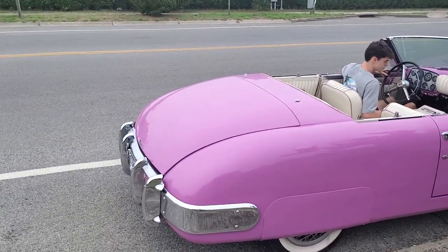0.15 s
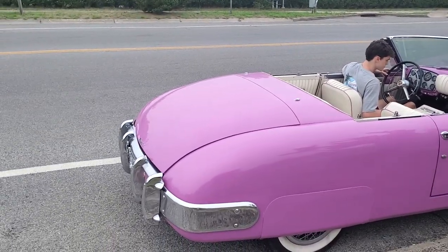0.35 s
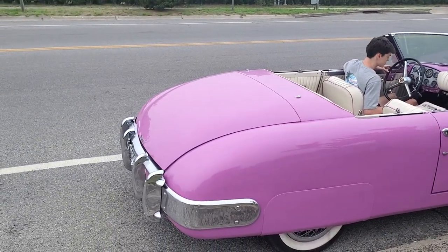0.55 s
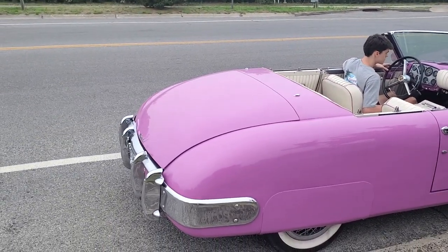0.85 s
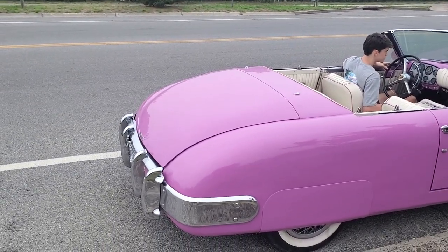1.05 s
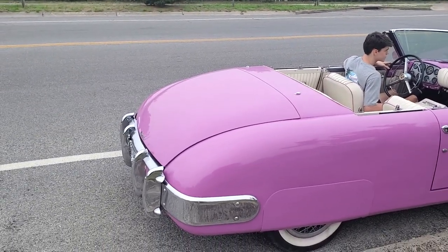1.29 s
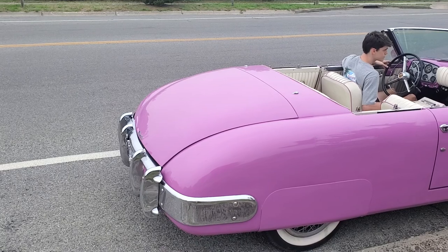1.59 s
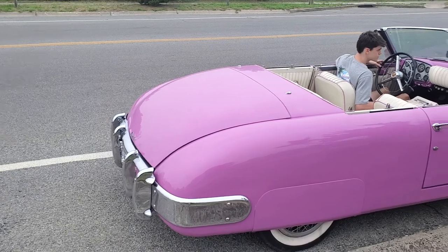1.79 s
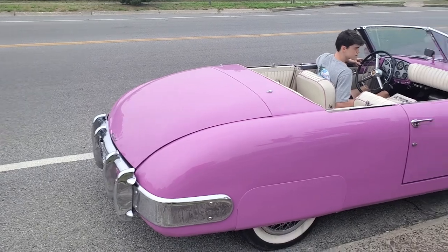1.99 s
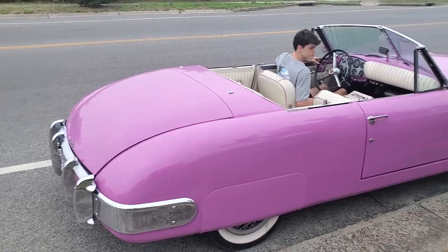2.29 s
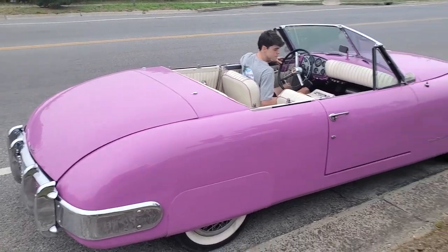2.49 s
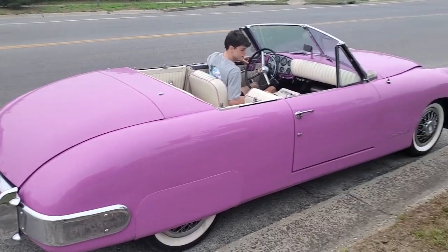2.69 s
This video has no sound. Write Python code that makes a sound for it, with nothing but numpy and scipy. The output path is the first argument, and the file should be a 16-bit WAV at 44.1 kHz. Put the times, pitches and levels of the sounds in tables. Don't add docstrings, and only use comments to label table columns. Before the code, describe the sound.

Loud V8 exhaust roars, drops to a lumpy popping idle, then blips twice more outdoors

```python
import sys
import numpy as np
from scipy import signal
from scipy.fft import rfft, irfft
from scipy.io import wavfile
from scipy.ndimage import uniform_filter1d

SR = 44100
rng = np.random.default_rng(int(sys.argv[2]) if len(sys.argv) > 2 else 0)


def store_wav(level_fs):
    pcm = np.round(np.clip(np.atleast_2d(level_fs), -1, 1) * 32767)
    wavfile.write(sys.argv[1], SR, pcm.T.astype(np.int16))


def voltage_ratio(decibels):
    exponent = np.asarray(decibels, float) / 20
    return 10 ** exponent


N = 125685
T = np.arange(N) / SR

# time in seconds, cylinder pressure in dB, gas rush in dB.
THROTTLE = [(0.0, -13.5, -30), (0.02, -11, -23.5), (0.55, -14, -26), (0.75, -12.5, -25.5),
            (0.86, -20.5, -41.5), (1.28, -32, -52.5), (1.45, -24, -48), (1.46, -21.5, -27),
            (1.65, -13, -23.5), (1.93, -12.5, -27.5), (1.94, -16, -33.5), (1.98, -23, -39),
            (2.06, -23.5, -44), (2.22, -12.5, -23.5), (2.51, -12, -27), (2.54, -16.5, -41), (2.7, -25, -53),
            (2.85, -24, -63)]
NEAR_HZ = (76, 212, 347, 420, 495, 800)


def evened(x):
    return x / np.sqrt(np.mean(x ** 2) + 1e-20)


def read(points, hz):
    f, value = np.transpose(points)
    return np.interp(np.log(hz + 1), np.log(f + 1), value)


def curve(table, order):
    return np.interp(T, *np.transpose(table)[[0, order]])


def by_throttle(shut, opened):
    return np.interp(curve(THROTTLE, order=1), [-26, -20], [shut, opened])


def ports(db_at, gate=1.):
    # frequency in Hz, left-right likeness (0 to 1).
    likeness = [(60, 0.83), (300, 0.89), (640, 0.27), (1400, 0.81), (3100, 0.67), (6800, 0.2),
                (15000, 0.22)]
    # frequency in Hz, left minus right in dB.
    lean = [(60, -46.5), (110, 13.5), (200, -4.5), (380, -1.5), (700, -3.5), (1290, 1.5), (2380, 3.5),
            (4400, 0.5), (8120, 0.0), (15000, 0)]
    # frequency in Hz, lead of the left in radians.
    lead = [(30, 0.9), (300, 0.3), (1000, 0.78), (2000, 1.07), (4000, 0.47), (16000, 2)]
    # left delay in seconds, right delay in seconds, level in dB.
    echoes = [
        (.0011, 0.00059, -27.5),
        (.0031, .0042, -17),
        (.0094, .0073, -17.5),
    ]
    hz = np.fft.rfftfreq(N, 1 / SR)
    a, b = rfft(gate * rng.standard_normal((2, N)))
    same = np.clip(read(likeness, hz), 0, 1)
    tilt = voltage_ratio(read(lean, hz) / 2)
    left = a * tilt * np.exp(1j * read(lead, hz))
    right = (same * a + np.sqrt(1 - same ** 2) * b) / tilt
    bounced = sum(voltage_ratio(db) * np.exp(-2j * np.pi * np.outer([left_s, right_s], hz))
                  for left_s, right_s, db in echoes)
    echo = 1 + bounced * (hz > 400)
    return irfft(np.array([left, right]) * echo * voltage_ratio(db_at(hz)), N)


def ring(modes):
    t = T[:SR // 4]
    return -sum(voltage_ratio(db - 60 * t / t60_s) * np.sin(2 * np.pi * hz * t) for hz, db, t60_s in modes)


def firings(cylinder_db, scatter_db):
    # time in seconds, firings per second.
    speed = [(0.0, 78.39), (0.2, 84.88), (0.79, 82.95), (1.08, 38.33), (1.3, 38.18), (1.43, 37.6),
             (1.62, 65.82), (1.77, 80.19), (1.95, 72.53), (2.1, 45.63), (2.17, 55.73), (2.33, 70.77),
             (2.45, 80.38), (2.53, 65.19), (2.7, 60.0), (2.85, 55.0)]
    near_bank = (0, 2, 3, 5)
    first_firing = -2.07
    count = np.floor(first_firing + np.cumsum(curve(speed, order=1)) / SR).astype(int)
    cylinder = count % 8
    luck = rng.standard_normal(count[-1] + 9)[count + 8]
    fires = np.diff(count, prepend=count[0] - 1) > 0
    clicks = fires * voltage_ratio(np.array(cylinder_db)[cylinder] + scatter_db * luck)
    return clicks, np.isin(cylinder, near_bank)


def road():
    # frequency in Hz, density in dB per Hz.
    wash_colour = [(18, -48), (30, -47.5), (90, 6.5), (469, -11), (835, -10.5), (1880, -16.5),
                   (4960, -30.5), (11200, -35), (15700, -32)]
    # frequency in Hz, density in dB per Hz.
    car_colour = [(59, -2), (100, 5), (323, -14), (440, -1), (1130, -18), (1280, -48), (4000, -76),
                  (5200, -89), (8800, -120)]
    wash_db, car_end_db, car_rise_db_per_s = -38, -17.5, 73
    wash = ports(lambda hz: read(wash_colour, hz))
    car = ports(lambda hz: read(car_colour, hz) - 25 * (hz > 4000))
    nearing = voltage_ratio(car_end_db - car_rise_db_per_s * (T[-1] - T))
    return voltage_ratio(wash_db) * evened(wash) + nearing * evened(car)


def pops():
    # time in seconds, peak in dB, pitch in Hz.
    bursts = [(.82, -16, 310), (.879, -18, 110), (.917, -17, 130), (1.096, -21, 150), (1.146, -20, 75),
              (1.251, -22, 140), (1.392, -22, 190), (1.421, -17, 70), (2.069, -20, 90), (2.145, -16, 70),
              (2.552, -16, 90), (2.584, -19, 130), (2.599, -14, 110), (2.637, -18, 150), (2.701, -21, 120),
              (2.775, -22, 200), (2.842, -21, 400)]
    t60_s = .05
    out = np.zeros(N + SR // 4)
    for s, db, hz in bursts:
        burst = ring([(hz, 0, t60_s + 3 / hz), (hz * 2.3, -9, .02)])
        out[round(s * SR):][:SR // 4] += voltage_ratio(db) * burst
    return uniform_filter1d(uniform_filter1d(out[:N], size=30), size=30)


def rasp():
    cylinder_db = [1, -10, -1.5, -2.5, -8, -1.5, -9, -11]
    # frequency in Hz, density in dB per Hz.
    gas = [(290, -56), (500, 0.5), (677, -6), (805, 0.5), (2990, -2), (4950, -12), (9750, -25),
           (13800, -17.5), (15700, -32)]
    # frequency in Hz, width in Hz, gain in dB.
    rings = [(1282, 36, 5.4), (1670, 153, 6.7), (1967, 230, 5.9), (2946, 610, 7.5), (3467, 67, 9),
             (4860, 83, 1)]
    # time in seconds, peak in dB.
    strays = [
        (1.0509, -36),
        (1.0759, -43),
        (1.2475, -45),
        (1.2599, -39),
        (1.3043, -39.5),
        (1.3866, -30),
        (1.4176, -32),
        (2.0846, -32),
        (2.1, -30.5),
        (2.119, -59),
    ]
    tint_hz = (1000, 1450, 1800, 2400, 3100, 3900, 5200, 7000, 10000, 14000)
    scatter_db, tint_db, idle_spit_db = 1.2, 2.6, -7
    rise_s, fall_s, fall_tilt = .0022, .005, .1
    rush_db, rush_tilt_db_per_octave = -15, 1.2

    def colour(hz):
        peaks = sum(db / (1 + (2 * (hz - f) / width) ** 2) for f, width, db in rings)
        return read(gas, hz) - 40 * (hz < 450) + peaks

    t = T[:SR // 20]
    rush = voltage_ratio(curve(THROTTLE, order=2))
    size = np.sqrt(np.mean(ports(colour) ** 2))
    clicks, _ = firings(cylinder_db, scatter_db)
    clicks = clicks * rush * np.where(rush < voltage_ratio(-38), voltage_ratio(idle_spit_db), 1)
    for s, db in strays:
        clicks[round(s * SR)] = voltage_ratio(db - 5.5)
    rise = np.sin(np.minimum(t / rise_s, 1) * np.pi / 2) ** 2
    out = 0
    for centre_hz, pick in zip(tint_hz, np.eye(len(tint_hz))):
        band = list(zip(tint_hz, pick))
        tinted = clicks * voltage_ratio(tint_db * rng.standard_normal(N))
        spit = rise * np.exp(-t / fall_s * (centre_hz / 2400) ** fall_tilt)
        steady = voltage_ratio(rush_db + rush_tilt_db_per_octave * np.log2(centre_hz / 2400)) * rush
        gate = signal.oaconvolve(tinted, spit)[:N] + steady
        out = out + ports(lambda hz: colour(hz) + 10 * np.log10(read(band, hz) + 1e-9), gate)
    return voltage_ratio(8.5) * out / size


def turbulence():
    # frequency in Hz, density in dB per Hz.
    churn = [(18, -42), (30, -80), (91, -10.5), (165, -4), (297, -10), (352, -8), (555, -20.5), (900, -30),
             (1170, -58), (1980, -120)]

    def swirl(hz):
        lift_db = sum(voltage_ratio(2.0) / (1 + ((hz - f) / 12) ** 2) for f in NEAR_HZ[1:3])
        return read(churn, hz) - 30 * (hz > 900) + lift_db

    return voltage_ratio(by_throttle(shut=-10, opened=-13)) * evened(ports(swirl))


def pipe_boom():
    thud_db = [-.7, -.6, 0, 0, 0, .4, -.3, 1.8]
    far_hz = (71, 108, 168, 266, 430)
    # level in dB, t60 in seconds.
    near_pipe = [(1.34, 0.16), (-2, 0.084), (-8, 0.2), (-12.5, 0.06), (-25, 0.093), (-21, 0.15)]
    # level in dB, t60 in seconds.
    far_pipe = [(3, 0.14), (-3.5, 0.15), (-13, 0.044), (-8.5, 0.078), (-17, 0.15)]
    near_lag_s, far_lag_s, pan_db, idle_dull_hz = -.0017, .0016, 1.6, 130
    clicks, near_bank = firings(thud_db, by_throttle(shut=4.5, opened=.9))

    def boom_of(bank, mode_hz, modes, lag_s):
        blow = np.convolve(ring([(f, *m) for f, m in zip(mode_hz, modes)]), np.hanning(40))
        return np.roll(signal.oaconvolve(clicks * bank, blow)[:N], round(lag_s * SR) - 20)

    near = boom_of(near_bank, NEAR_HZ, near_pipe, near_lag_s)
    far = boom_of(~near_bank, far_hz, far_pipe, far_lag_s)
    left = voltage_ratio(pan_db) * near + voltage_ratio(-pan_db) * far
    right = voltage_ratio(-pan_db) * np.roll(near, 8) + voltage_ratio(pan_db) * np.roll(far, -8)
    boom = np.array([left, right])
    soft = by_throttle(shut=.75, opened=0)
    dull = signal.sosfiltfilt(signal.butter(2, idle_dull_hz, fs=SR, output="sos"), boom)
    boom = (1 - soft) * boom + soft * dull
    return boom / np.sqrt(uniform_filter1d((boom ** 2).mean(0), SR // 5) + 1e-12)


def exhaust():
    return voltage_ratio(curve(THROTTLE, order=1)) * (voltage_ratio(-2.14) * pipe_boom() + turbulence())


def scene():
    return road() + pops() + rasp() + exhaust()


def top_cut(x):
    return signal.sosfilt(signal.butter(12, 15840, fs=SR, output="sos"), x)


def record(dry):
    cut = signal.sosfiltfilt(signal.butter(2, 46, "high", fs=SR, output="sos"), dry)
    return top_cut(cut)


dry = scene()
out = record(dry)
store_wav(out)
```